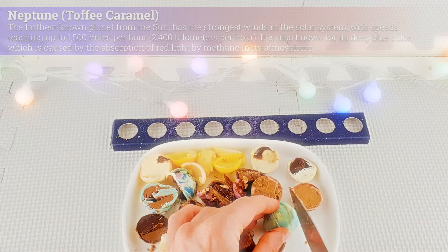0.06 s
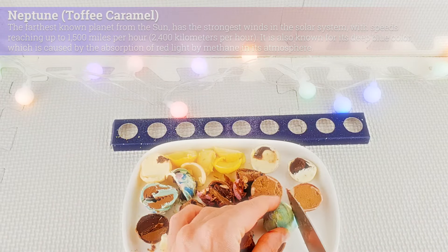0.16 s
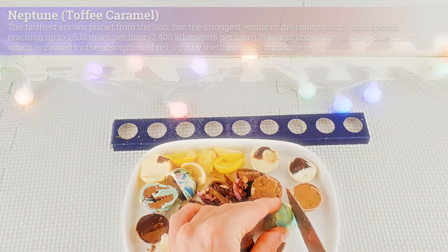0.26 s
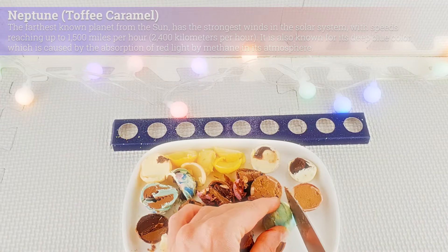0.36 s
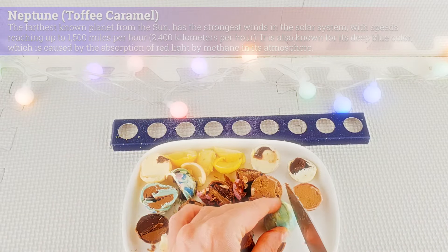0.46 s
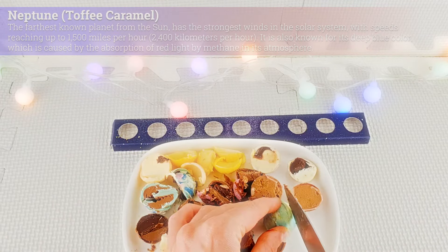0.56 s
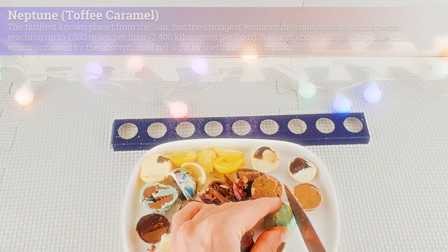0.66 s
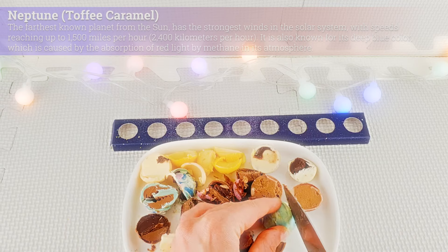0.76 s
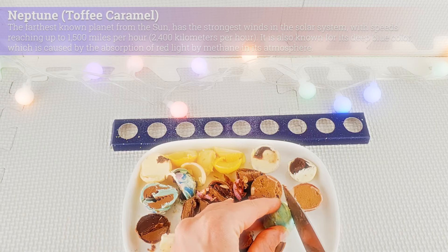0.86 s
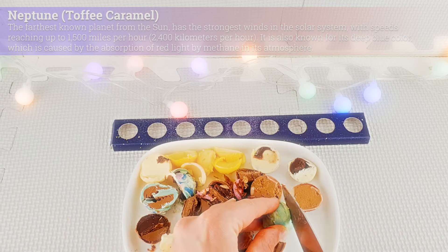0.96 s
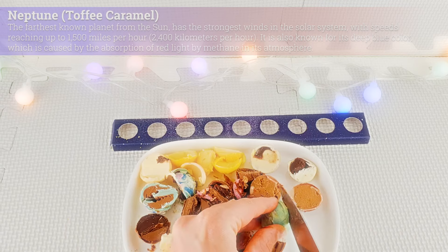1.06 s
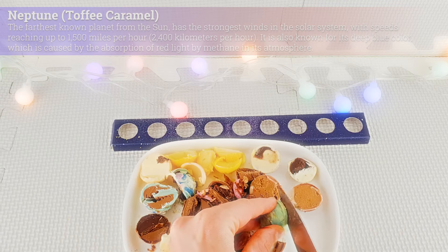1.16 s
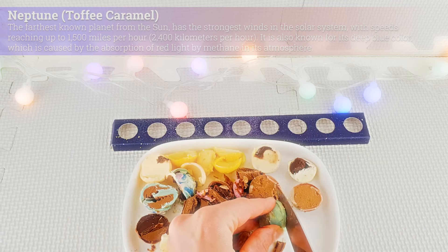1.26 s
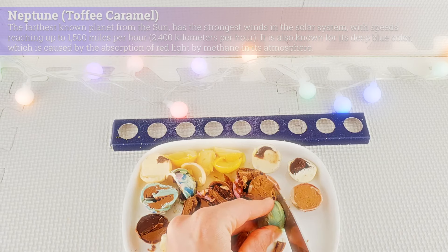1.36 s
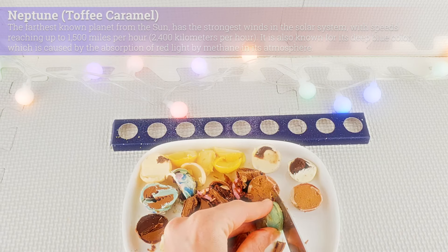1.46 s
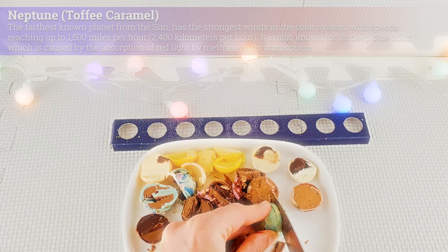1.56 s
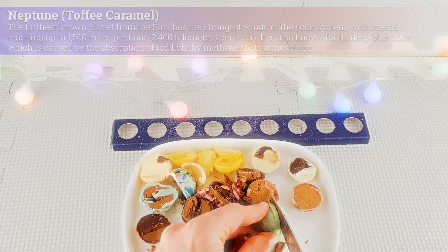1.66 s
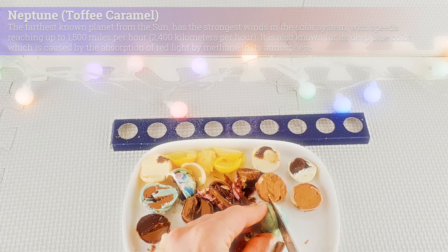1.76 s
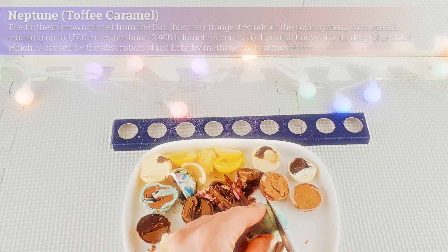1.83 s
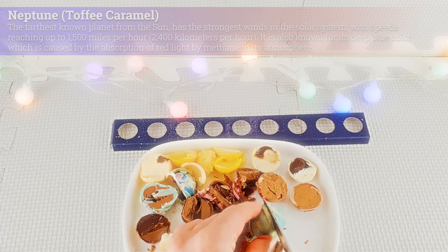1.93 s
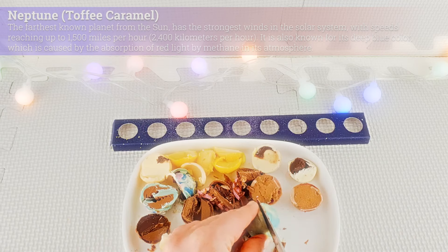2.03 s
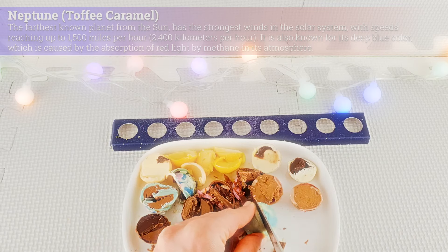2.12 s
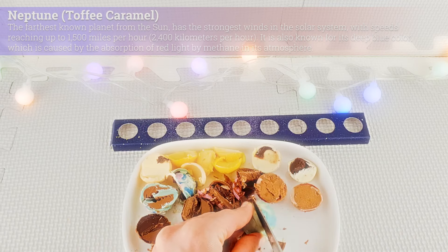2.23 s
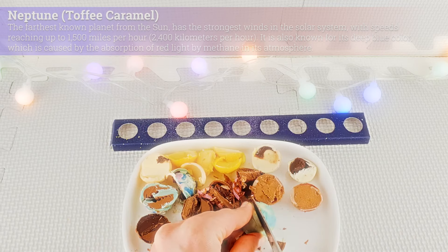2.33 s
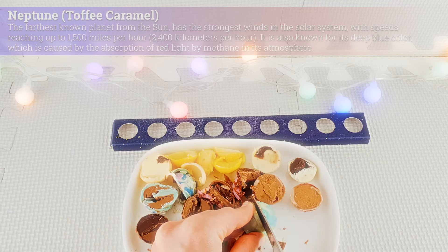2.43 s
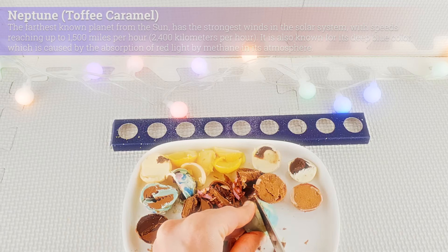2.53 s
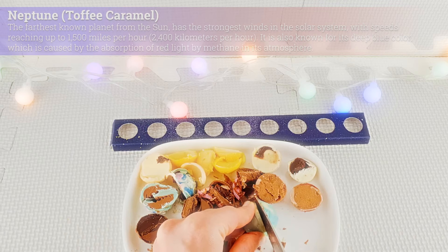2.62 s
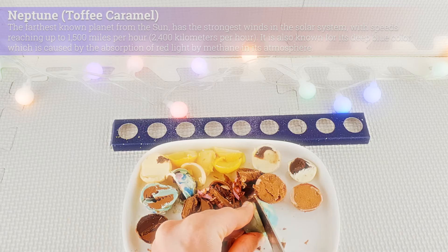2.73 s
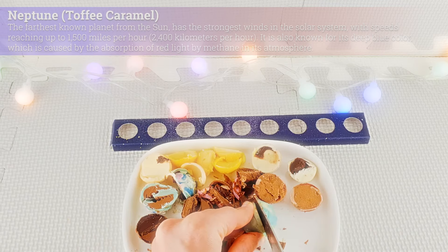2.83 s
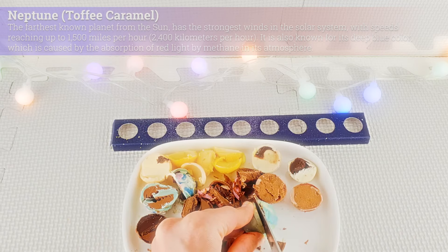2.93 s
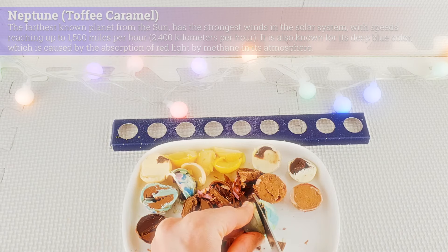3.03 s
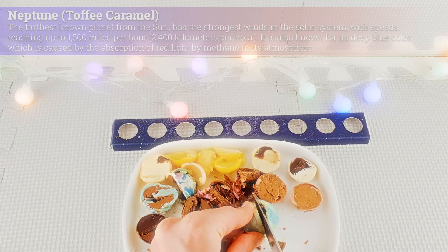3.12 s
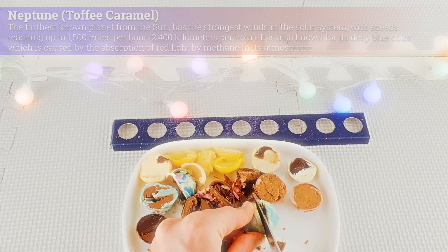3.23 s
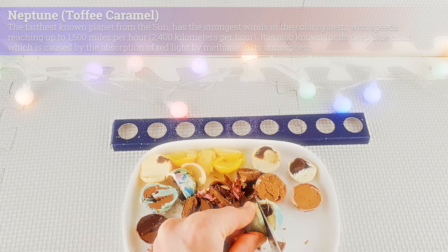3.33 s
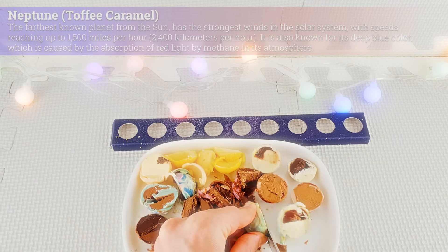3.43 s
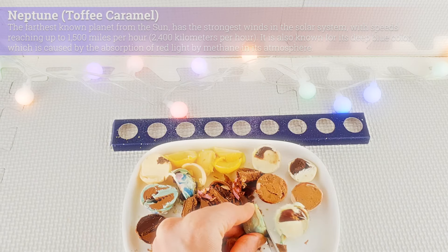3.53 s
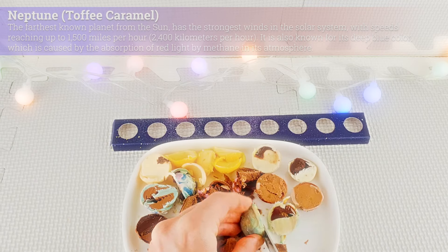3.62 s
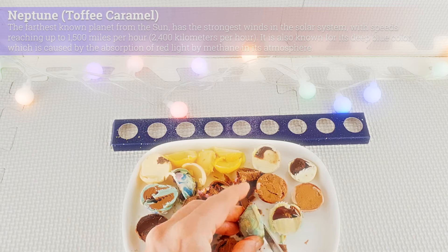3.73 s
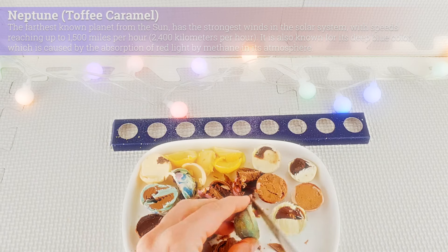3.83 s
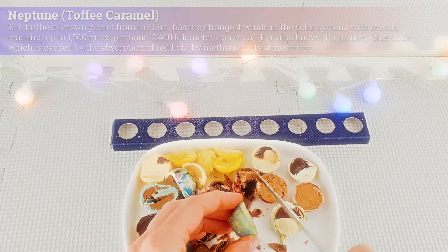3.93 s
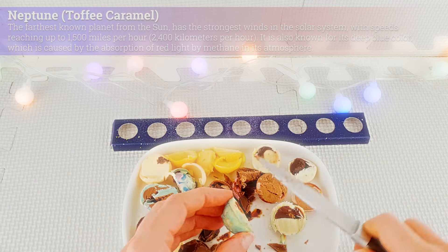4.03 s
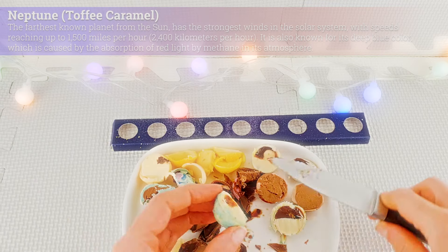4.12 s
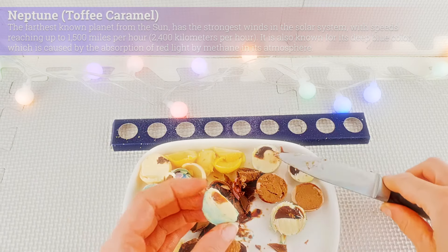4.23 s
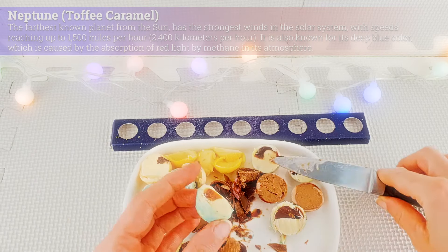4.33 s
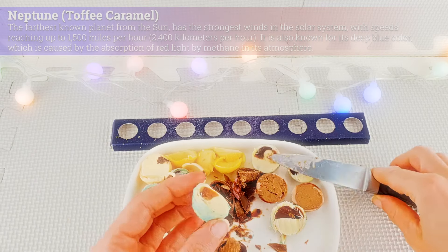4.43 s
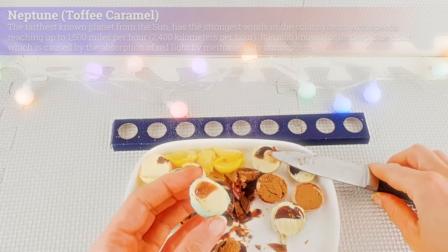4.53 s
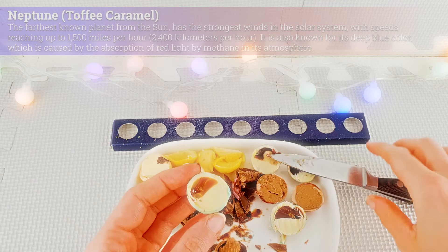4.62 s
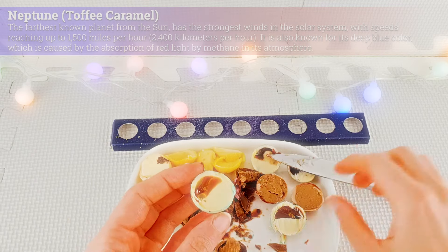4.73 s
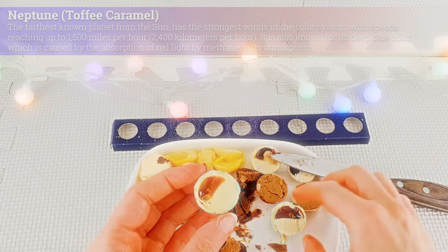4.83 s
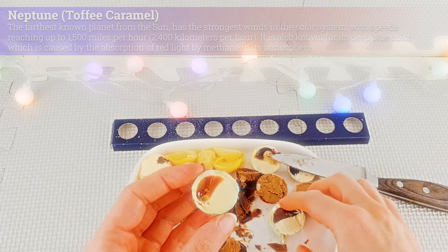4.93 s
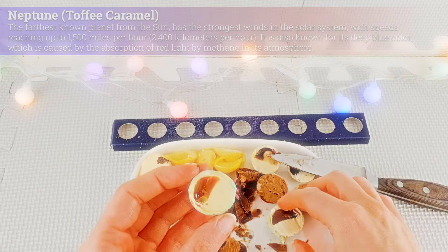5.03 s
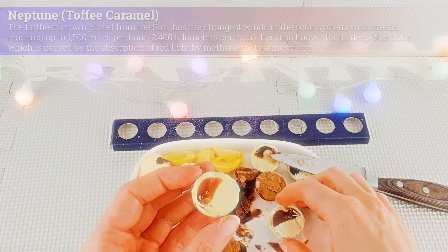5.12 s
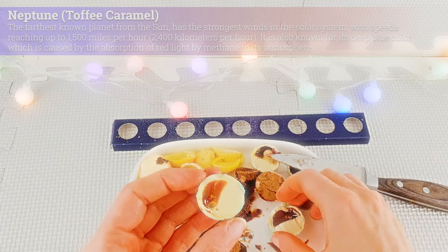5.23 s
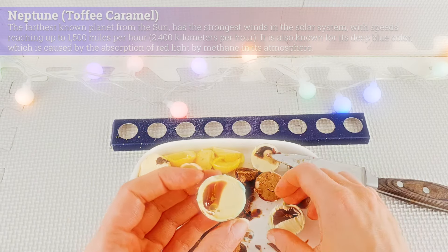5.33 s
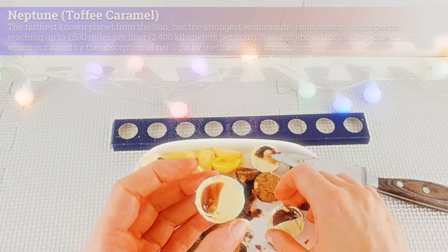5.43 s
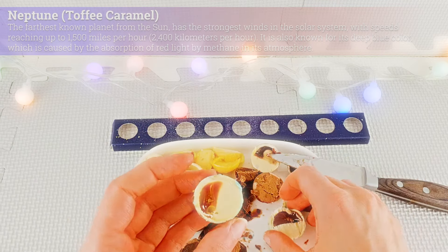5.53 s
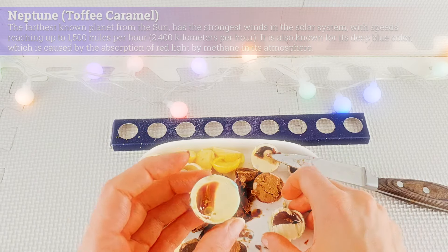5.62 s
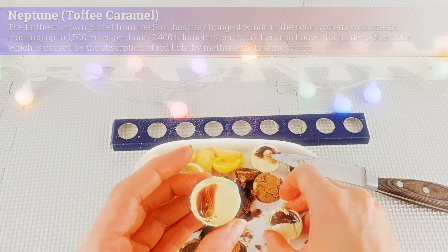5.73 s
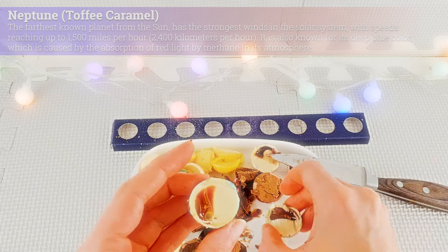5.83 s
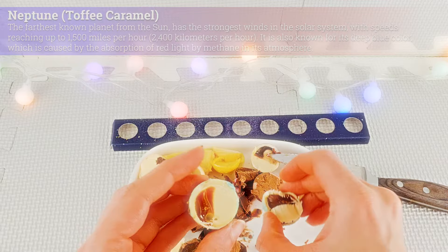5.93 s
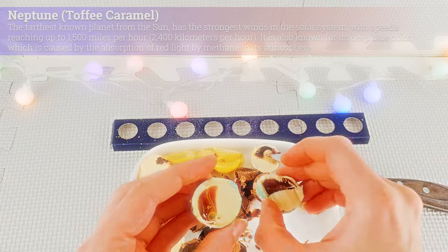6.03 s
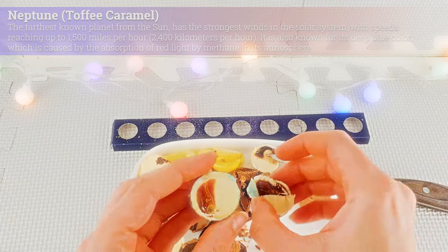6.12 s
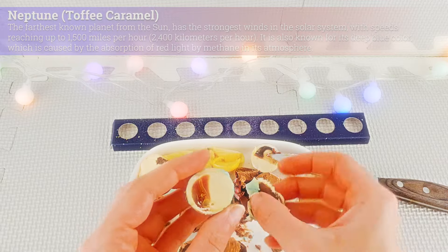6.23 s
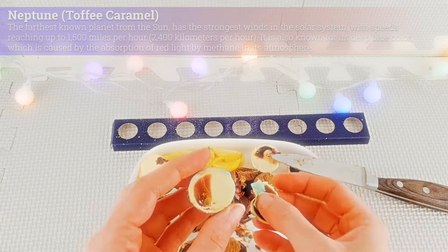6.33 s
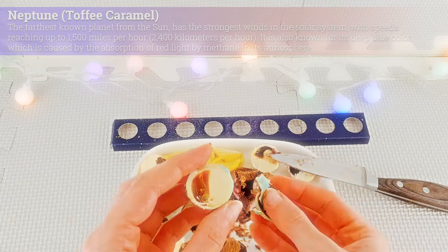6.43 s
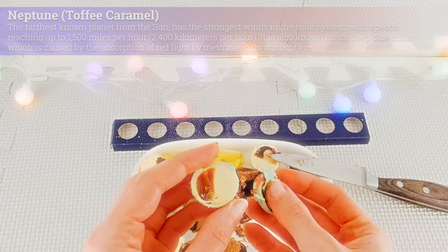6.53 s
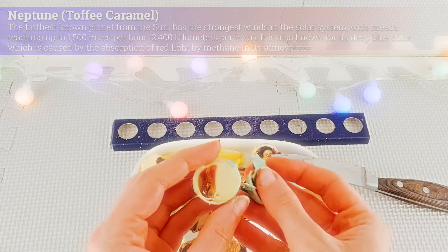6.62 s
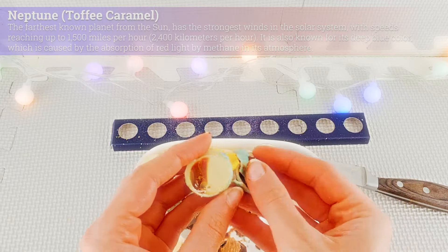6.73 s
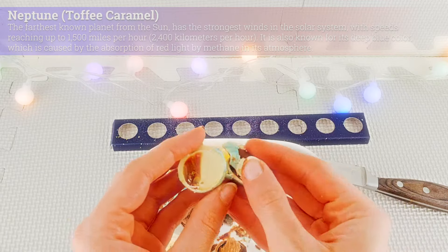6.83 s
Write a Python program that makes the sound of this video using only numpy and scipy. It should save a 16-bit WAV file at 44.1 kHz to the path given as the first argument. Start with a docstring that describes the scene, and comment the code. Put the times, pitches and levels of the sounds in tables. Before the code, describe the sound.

A knife cuts through a hard chocolate shell with soft bumps and one loud crack against a china plate, then clinks down.

```python
"""A knife works through a hard chocolate truffle on a china plate, close to a stereo microphone in a
small room. Hands bump the plate and set the table booming. The blade creaks in the shell, breaks
through and strikes the china hard enough to overload. The knife is laid on the rim with two clinks, and
a chip of shell snaps as the halves are picked up. Low building rumble and faint hiss lie underneath."""
import sys
import numpy as np
from scipy import signal
from scipy.fft import rfft, irfft
from scipy.io import wavfile

SR = 44100
rng = np.random.default_rng(int(sys.argv[2]) if len(sys.argv) > 2 else 0)


def master(y):
    """Save y as 16-bit WAV."""
    cut = np.clip(np.atleast_2d(y).T, -1, 1)
    pcm = np.round(cut * 32767)  # scale
    wavfile.write(sys.argv[1], SR, pcm.astype(np.int16))


N = 302922
T = np.arange(N) / SR
RING_T = T[:int(.8 * SR)]

# room tone spectrum: (frequency [Hz], relative level [dB])
ROOM_TONE = [(25, -21.5), (42, -9), (80, 0), (120, -3), (180, -10.5), (250, -31), (400, -35), (1000, -40),
             (4000, -44.5), (6300, -51), (12000, -53.5), (16000, -61)]
# small dry ticks (shell chips, the click of a knock, the start of a scrape):
# (time [s], level [dB], centre [Hz], width [octaves])
TICKS = [(0.089, -72, 2640, 0.087), (.724, -70.5, 6640, .45), (3.306, -52.5, 4400, 0.16),
         (3.3504, -48.5, 6100, 1.6), (3.735, -65, 6660, 0.29), (4.3974, -60, 2500, 1.0),
         (5.789, -68.5, 4940, 0.23), (6.2395, -55.5, 4280, 2.1)]
# spectrum of a snap: (frequency [Hz], relative level [dB])
SNAP_SPECTRUM = [(120, -26.5), (300, -9), (750, -2), (1100, -8), (1550, -12.5), (2100, -1.5), (3600, 5.5),
                 (6000, -6), (11000, -10), (16000, -12)]
# soft knocks of hand and truffle on the plate: (time [s], push [dB])
KNOCKS = [(0.093, -13), (0.5185, -11.5), (1.708, -40.5), (1.776, -31.5), (1.802, -30.5), (1.932, -32.5),
          (2.9974, -29), (3.014, -31), (3.3076, -15.5), (4.3972, -16), (4.553, -31), (4.939, -48.5),
          (5.045, -46.5)]
# knocking modes of the wooden table top: (frequency [Hz], level [dB], t60 [s])
BODY_MODES = [(297.4, -5, .11), (370.5, -1, 0.024), (503, -4.5, 0.036), (632.3, -2, 0.026),
              (862.5, -6.5, 0.038), (1156.3, -4, 0.019)]
# steel blade: (frequency [Hz], level struck at the heel [dB], level struck at the tip [dB], t60 [s])
BLADE_MODES = [(940, -4.5, -11.5, 0.031), (1209, -6, -11, 0.021), (2242, -11, -16, 0.015),
               (3030, -3.5, -16.5, 0.0024), (3643, -3, -6.5, 0.026), (4600, -8, -3.5, 0.018),
               (6590, 1.5, -11.5, 0.033), (7156, -7, -1, 0.028), (8697, -6.5, 0, 0.049),
               (9270, -12.5, 2, 0.018), (10400, -11, -7.5, .015), (11800, -3.5, -8.5, .012)]
# table under the plate: (frequency [Hz], signed swing [relative], t60 [s])
TABLE_MODES = [(45.97, 0.17, .24), (82.5, .08, 0.47), (92.2, .76, .29), (113.2, 0.7, 0.12),
               (122, -1.3, 0.22), (150.5, -1.1, .18), (182.1, -.44, 0.18), (211, -.046, .22)]
# room reverberation, before its quiet end is cut short as by a noise suppressor:
# (frequency [Hz], t60 [s])
ROOM_DECAY = [(250, 0.47), (1000, 0.76), (2500, 0.5), (4200, 0.61), (7700, 0.4), (12000, 0.19)]
# fingers shifting their grip: (time [s], half length [s], table rumble [dB])
RUBS = [(0.483, 0.089, -54.5), (0.911, 0.18, -60.5), (1.75, 0.12, -53), (2.004, 0.037, -51),
        (2.683, 0.28, -58.5), (3.234, 0.13, -62), (5.154, 0.14, -70), (5.795, 0.089, -52.5),
        (6.45, 0.2, -69.5)]
# spectrum of rustling skin: (frequency [Hz], relative level [dB])
RUSTLE_SPECTRUM = [(150, -14.5), (400, -1.5), (850, -6.5), (1400, -16), (4000, -26.5)]
# the blade brushing the shell: (time [s], level [dB])
BRUSHES = [(1.25, -82.5), (1.625, -77.5), (4.02, -102)]
# spectrum of that brushing: (frequency [Hz], relative level [dB])
BRUSH_SPECTRUM = [(1200, -4), (3200, 4.5), (4500, 10), (7000, 6), (10000, -5), (15000, -23)]
# chocolate creaking under pressure: (time [s], hold [s], level [dB])
CREAKS = [(2.475, 0.014, -78), (2.995, 0.024, -61.5), (3.325, .03, -53), (5.807, 0.031, -75)]
# china plate: (frequency [Hz], level [dB], t60 [s])
PLATE_MODES = [(2100, -12.5, 0.022), (2923, -20, 0.03), (3548, -20.5, 0.018), (4110, -4, 0.019),
               (4166, 2, 0.034), (4220, -7, 0.033), (4800, -6, 0.028), (4953, -20.5, .015),
               (7117, -19.5, 0.014), (7780, -12.5, 0.026), (8925, -23, 0.0068), (11300, -16.5, 0.021),
               (13050, -9.5, 0.021), (12400, -13, .01)]
# spectrum of the crumbling shell: (frequency [Hz], relative level [dB])
GRIT_SPECTRUM = [(1500, -25.5), (2200, -17.5), (3300, -12), (4400, 3.5), (5600, -3), (6400, -16),
                 (7300, -8.5), (8300, -24), (15000, -34.5)]
# steel striking china: (time [s], snap [dB], plate [dB], body [dB], blade [dB], place [0 heel - 1 tip],
# rattle [dB], low-pass [Hz], push on the table [dB], room send [dB])
STRIKES = [(3.358, -7, -1, -16.5, -26, .42, -22, 16500, -7.5, 2),
           (4.4158, -22, -25.5, -46, -24, 0.057, -10, 11500, -12, -7),
           (4.5919, -30.5, -16, -45, -21.5, 1, -6, 9700, -18, -14.5)]


def undb(db):
    """Decibels to gain."""
    return 10 ** (np.asarray(db) / 20)


def unit(x):
    """Scale to rms 1."""
    return x / np.sqrt(np.mean(x ** 2))


def pan(db):
    """Gains that put the left capsule db above the right."""
    return undb(np.array([[db], [-db]]) / 2)


def fade(t60):
    """Exponential decay, 60 dB down after t60 seconds."""
    return np.exp(-np.log(1000) * RING_T / t60)


def swell(s, half_s):
    """Bell-shaped rise and fall around a moment."""
    return np.exp(-.5 * ((T - s) / half_s) ** 2)


def colour(x, points):
    """Shape a sound by a smooth spectrum."""
    hz, db = np.transpose(points)
    f = np.fft.rfftfreq(x.shape[-1], 1 / SR)
    return irfft(rfft(x) * undb(np.interp(np.log(f + 1), np.log(hz), db)), x.shape[-1])


def butter(x, hz, kind, order=2):
    """Causal low-pass or high-pass."""
    return signal.sosfilt(signal.butter(order, hz, kind, fs=SR, output="sos"), x)


def convolve(x, response):
    """Pass a sound through a mono or stereo response."""
    return signal.fftconvolve(np.atleast_2d(x), np.atleast_2d(response), axes=-1)[:, :N]


def add(out, s, sound):
    """Mix a sound in at a time."""
    i = int(s * SR)
    out[:, i:i + sound.shape[-1]] += sound[:, :N - i]


def air_noise(size, alike_hz):
    """Stereo noise whose long waves reach both capsules alike."""
    mid, side = rng.standard_normal((2, size))
    return unit(mid + butter(side, alike_hz, "high", order=1) * np.array([[1], [-1]]))


def ring(modes, lag_ms):
    """Decaying modes of a struck object, reaching the right capsule a little later."""
    t = np.maximum(RING_T - np.array([[0], [lag_ms / 1000]]), 0)
    return sum(undb(db) * np.sin(2 * np.pi * hz * t) * np.exp(-np.log(1000) * t / t60)
               for hz, db, t60 in modes)


def room_tone(level_db=-66.5):
    """Low building rumble under a faint even hiss, all round the microphone."""
    return undb(level_db) * unit(colour(air_noise(N, alike_hz=596), ROOM_TONE)) * pan(-1.6)


def snap_noise():
    """Bright contact noise; a quick fade makes it a snap."""
    return unit(colour(air_noise(len(RING_T), alike_hz=2400), SNAP_SPECTRUM))


def ticks(t60=.1, room_db=-12):
    """Small dry ticks, each a band of noise: shell chips, the click of a knock, the start of a scrape."""
    f = np.fft.rfftfreq(len(RING_T), 1 / SR)
    for s, db, centre_hz, width in TICKS:
        octaves = np.log2((f + 1) / centre_hz)
        band = np.exp(-.5 * (octaves / width) ** 2)
        noise = unit(irfft(rfft(snap_noise()) * band, len(RING_T)))
        yield s, undb(db) * noise * fade(t60) * pan(-1.5), room_db


def blade(place):
    """The struck place, 0 heel to 1 tip, decides which of the blade's modes speak."""
    modes = [(hz, np.interp(place, [0, 1], [heel, tip]), t60) for hz, heel, tip, t60 in BLADE_MODES]
    return ring(modes, lag_ms=0.033)


def knocks(muffle_hz=1250, room_db=2.5):
    """Hand and truffle bump the plate: a dull thud from the table top beneath, with a trace of the blade."""
    ringing = undb(-42.5) * ring(BODY_MODES, lag_ms=0.011) + undb(-59.5) * blade(place=0)
    for s, db in KNOCKS:
        thud = ringing + undb(-49) * snap_noise() * fade(t60=.09)
        yield s, undb(db) * butter(thud, muffle_hz, "low"), room_db


def table(rumble, lag_s=0.00084, soft_s=0.0017, steel_s=.0014, landing_s=0.002):
    """Blows and unsteady hands set the table top booming near the microphone; a wider push is duller."""
    pushes = [(s + lag_s, db, soft_s) for s, db in KNOCKS]
    pushes += [(s + lag_s, db, steel_s) for s, *_, db, _ in STRIKES]
    pushes += [(s, db, landing_s) for s, db in hand_bounces()]
    force = np.zeros(N)
    for s, db, half_s in pushes:
        push = swell(s, half_s)
        force += undb(db) * push / push.sum()
    boom = sum(swing * np.sin(2 * np.pi * hz * RING_T) * fade(t60) for hz, swing, t60 in TABLE_MODES)
    boom = butter(butter(boom, 60, "high", order=1), 60, "high", order=1)
    unsteady_hands = butter(rng.standard_normal(N), 82, "low")
    tremor = unit(convolve(unsteady_hands, boom))
    return butter(convolve(force, boom) + rumble * tremor, 36, "high") * pan(-0.54)


def room(x, early_db=-1.5, early_t60=0.12, tail_db=-2.5, gap_s=0.0048, build_s=0.004, suppress_s=0.17):
    """Quick reflections off the table and nearby things, then a diffuse tail whose treble dies first."""
    hz, t60 = np.transpose(ROOM_DECAY)
    log_f = np.log(np.fft.rfftfreq(len(RING_T), 1 / SR) + 1)
    noise = rfft(air_noise(len(RING_T), alike_hz=450))
    bands = [np.interp(log_f, np.log(hz), peak) for peak in np.eye(len(hz))]
    tail = sum(irfft(noise * band, len(RING_T)) * fade(decay) for band, decay in zip(bands, t60))
    tail *= np.clip((RING_T - gap_s) / build_s, 0, 1)
    tail *= np.exp(-(RING_T / suppress_s) ** 2)  # the quiet end is cut short as by a noise suppressor
    early = air_noise(len(RING_T), alike_hz=1208) * fade(early_t60)
    response = (undb(early_db) * unit(early) + undb(tail_db) * unit(tail)) / np.sqrt(len(RING_T))
    return convolve(x, response)


def fingers(rustle_db=-28):
    """Each shift of grip weighs on the table and rustles in step; gives rumble envelope and rustle."""
    rumble = sum(undb(db) * swell(s, half_s) for s, half_s, db in RUBS)
    skin = unit(colour(air_noise(N, alike_hz=699), RUSTLE_SPECTRUM))
    return rumble, undb(rustle_db) * rumble * skin


def brushing(half_s=0.047):
    """The blade hisses faintly where it brushes the shell."""
    touch = sum(undb(db) * swell(s, half_s) for s, db in BRUSHES)
    return touch * unit(colour(air_noise(N, alike_hz=700), BRUSH_SPECTRUM))


def creak(slips_per_s=1500, rise_db_per_s=479, fall_db_per_s=519, grit_db=-6):
    """Chocolate sticks and slips under pressure, ringing the plate right of centre while crumbs grind."""
    slips = (rng.random(N) < slips_per_s / SR) * rng.standard_normal(N)
    singing = convolve(slips, ring(PLATE_MODES, lag_ms=0.051))
    singing = butter(butter(singing, 7000, "low"), 3600, "high")
    crumbs = unit(colour(air_noise(N, alike_hz=697.5), GRIT_SPECTRUM))
    pressure = np.zeros(N)
    for s, hold_s, db in CREAKS:
        before_s, after_s = np.maximum(s - T, 0), np.maximum(T - s - hold_s, 0)
        pressure += undb(db - rise_db_per_s * before_s - fall_db_per_s * after_s)
    return pressure * (unit(singing) * pan(-6) + undb(grit_db) * crumbs)


def strikes():
    """Steel hits china close to the microphone: a snap, and plate, body and blade ring together."""
    plate, body = ring(PLATE_MODES, lag_ms=0.071), ring(BODY_MODES, lag_ms=0.011)
    for s, snap_db, plate_db, body_db, blade_db, place, rattle_db, bright_hz, _, room_db in STRIKES:
        snap = undb(snap_db) * snap_noise() * fade(t60=0.022)
        ringing = undb(plate_db) * plate + undb(body_db) * body + undb(blade_db) * blade(place)
        hit = rattle(snap + ringing, rattle_db)
        yield s, butter(hit, bright_hz, "low") * pan(-0.45), room_db


def rattle(hit, db, t60=0.075):
    """The steel chatters on the china for a moment and so strikes it again many times."""
    chatter = rng.standard_normal(len(RING_T)) * fade(t60)
    repeats = convolve(hit, chatter / np.linalg.norm(chatter))[:, :len(RING_T)]
    return hit + undb(db) * repeats


def hand_bounces(landing_s=3.3713, push_db=9, gap_s=.0323, shrink=0.97, loss_db=6):
    """The shell gives way and the hand lands and rebounds, sooner and weaker; gives (time, push) pairs."""
    bounce = np.arange(3)
    gaps = gap_s * shrink ** bounce
    return zip(landing_s + np.cumsum(gaps) - gaps, push_db - loss_db * bounce)


def scene():
    """Knife, plate and fingers close up, the small room behind them and the table booming beneath."""
    closing = 1 - np.exp(-RING_T / 0.00074)  # each contact takes a moment to close
    contacts, room_send = np.zeros((2, 2, N))
    for s, hit, room_db in [*strikes(), *knocks(), *ticks()]:
        add(contacts, s, hit * closing)
        add(room_send, s, hit * closing * undb(room_db))
    rumble, rustle = fingers()
    friction = rustle + brushing() + creak()
    reflections = room(room_send + undb(-15) * friction)
    return contacts + friction + reflections + table(rumble) + room_tone()


def record(dry, top_hz=15800):
    """At this distance the crack clips at full scale; a steep low-pass cuts the top."""
    cut = signal.ellip(8, .2, 70, top_hz, fs=SR, output="sos")
    return signal.sosfilt(cut, np.clip(dry, -1, 1))


dry = scene()
out = record(dry)
master(out)
```